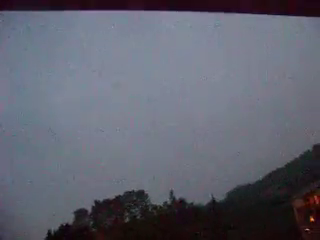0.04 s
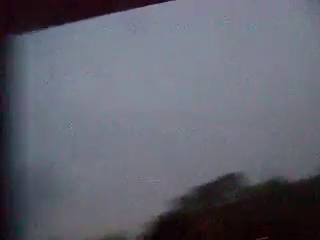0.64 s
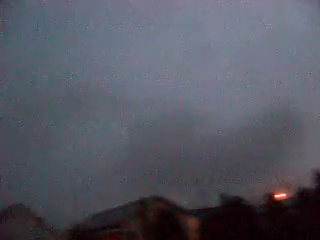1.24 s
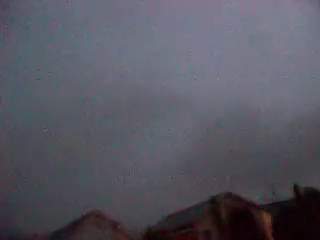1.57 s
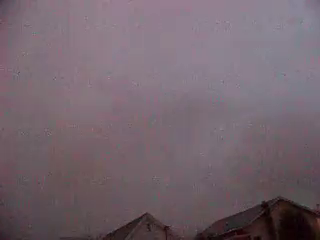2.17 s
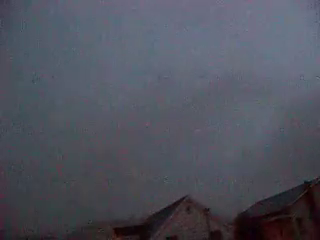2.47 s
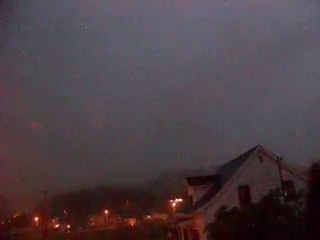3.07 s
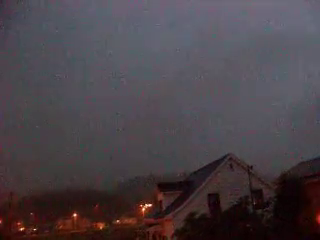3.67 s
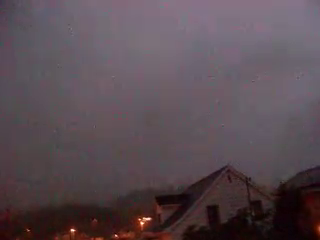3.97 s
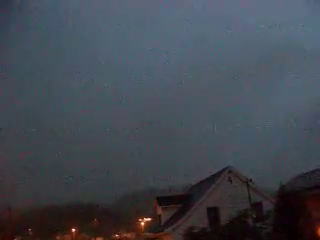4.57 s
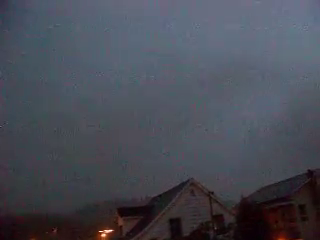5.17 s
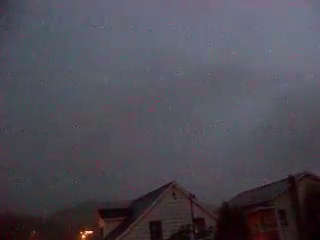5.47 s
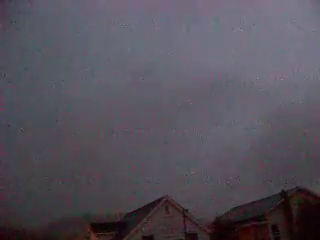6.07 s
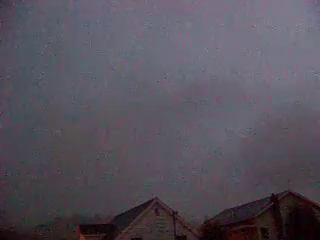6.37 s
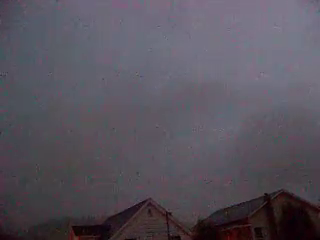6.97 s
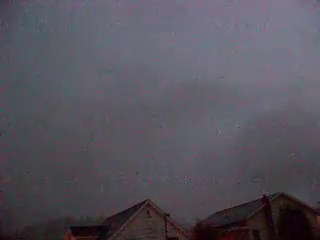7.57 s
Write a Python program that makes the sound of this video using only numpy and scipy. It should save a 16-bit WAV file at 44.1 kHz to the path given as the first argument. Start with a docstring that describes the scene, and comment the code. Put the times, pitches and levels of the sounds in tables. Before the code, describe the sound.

Thunder builds quickly from a few deep thuds to a booming clap, then rumbles on over a soft, even wash of rain. Occasional drips tap and ring on nearby metal. The rain swells, and a weaker, growling roll of thunder follows in several waves. The storm is picked up by a small camera microphone under a porch roof, which gives the rain a slightly hollow, muffled tone.

```python
"""Thunder over a hillside town in steady rain, heard from a porch through a small camera's microphone.
Shock waves from the lightning channel arrive as thuds, pile up into a clap and roll away; a second,
lighter peal follows while the rain swells. The porch roof rings hollow; a few drops ping on metal."""
import sys
import numpy as np
from scipy import signal
from scipy.fft import rfft, irfft
from scipy.io import wavfile
from scipy.ndimage import uniform_filter1d

SR = 44100
rng = np.random.default_rng(int(sys.argv[2]) if len(sys.argv) > 2 else 0)


def store_wav(level_fs):
    """Save 16-bit WAV to argv[1]."""
    pcm = np.round(np.clip(np.atleast_2d(level_fs), -1, 1) * 32767)
    wavfile.write(sys.argv[1], SR, pcm.T.astype(np.int16))


N = 345170
TIME = np.arange(N) / SR


def undb(db):
    """Decibels to gain."""
    return 10 ** (np.asarray(db) / 20)


def unit(x):
    """Scale to rms 1."""
    return x / np.sqrt(np.mean(x ** 2))


def add(out, start_s, sound):
    """Mix a sound in at start_s."""
    start = int(start_s * SR)
    out[start:start + len(sound)] += sound[:N - start]


def butter(x, hz, kind, order=2):
    """Butterworth low-, high- or band-pass."""
    return signal.sosfilt(signal.butter(order, hz, kind, fs=SR, output="sos"), x)


def colour(x, response):
    """Minimum-phase filter from (frequency [Hz], gain [dB]) rows; output rms 1."""
    hz, db = np.transpose(response)
    bins_hz = np.maximum(np.fft.rfftfreq(N, 1 / SR), 1)
    gain = undb(np.interp(np.log(bins_hz), np.log(hz), db))
    cepstrum = irfft(np.log(gain), N)
    cepstrum[1:N // 2] *= 2  # fold onto positive time: causal
    cepstrum[N // 2 + 1:] = 0
    return unit(irfft(rfft(x) * np.exp(rfft(cepstrum)), N))


def waver(per_s):
    """Random steps, smoothed twice; rms 1."""
    hold = int(SR / per_s)
    steps = np.repeat(rng.standard_normal(N // hold + 1), hold)
    return unit(uniform_filter1d(uniform_filter1d(steps, hold), hold)[:N])


def arrivals(per_s, spread_db):
    """Impulses of random time, size and sign."""
    hits = rng.random(N) < per_s / SR
    return hits * undb(spread_db * rng.standard_normal(N)) * rng.choice([-1, 1], N)


def envelope(bed_db, swells):
    """Gain of a steady bed plus swells that rise, hold and fall; powers add."""
    power = undb(bed_db) ** 2
    for crest_s, rise_db_per_s, hold_s, fall_db_per_s, db in swells:
        before_s = np.maximum(crest_s - TIME, 0)
        after_s = np.maximum(TIME - crest_s - hold_s, 0)
        power += undb(db - rise_db_per_s * before_s - fall_db_per_s * after_s) ** 2
    return np.sqrt(power)


def rain():
    """Far drops merge into a wash, nearer ones patter faintly; the porch roof adds a hollow band."""
    # rain spectrum: (frequency [Hz], gain [dB])
    spectrum = [(200, -12.5), (500, 0), (720, -8), (950, -0.5), (1200, 2), (1500, -3.5), (1850, -11),
                (2350, -9.5), (2750, -17.5), (3200, -19.5), (4000, -27.5), (5500, -32.5), (6800, -31),
                (8200, -45.5)]
    # roof ring, fading as the microphone turns to the open: (time [s], level re wash [dB])
    porch = [(0, -12), (1.25, -12), (1.7, -19.5), (2.1, -30), (3.6, -31), (4.2, -19), (7.8, -16)]
    # rain surges: (crest [s], rise [dB/s], hold [s], fall [dB/s], level [dB])
    surges = [(1.196, 31, 0.044, 12, -43.5), (4.103, 34, .08, 12.5, -41.5), (5.953, 18.5, 0.56, 6.5, -39)]
    wash = colour(rng.standard_normal(N), spectrum) * undb(0.26 * waver(per_s=9))
    patter = colour(arrivals(per_s=900, spread_db=2.5), spectrum)
    roof_db = np.interp(TIME, *np.transpose(porch))
    roof = unit(butter(rng.standard_normal(N), [700, 900], "band")) * undb(roof_db)
    return (wash + undb(-8.5) * patter + roof) * envelope(bed_db=-44.5, swells=surges)


def peal(spectrum, per_s, spread_db, even_s):
    """Shocks from countless kinks of the channel, dulled by the air; power levelled over even_s."""
    shocks = colour(arrivals(per_s, spread_db), spectrum)
    span = int(even_s * SR)
    power = uniform_filter1d(uniform_filter1d(shocks ** 2, span), span)
    return shocks / np.sqrt(power)


def thunder():
    """A deep, heaving roll and a lighter growl swell over the steady bed of the distant storm."""
    # roll and growl spectra: (frequency [Hz], gain [dB])
    roll_spectrum = [(20, -43), (35, -22.5), (50, -8.5), (70, -2), (95, 1), (125, -0.5), (170, -6),
                     (230, -14), (350, -21), (500, -40.5), (800, -54), (2000, -69)]
    growl_spectrum = [(40, -18.5), (90, -16.5), (150, -1.5), (215, 2.5), (290, -4), (370, -2.5),
                      (500, -6.5), (620, -17), (800, -27), (1500, -59.5)]
    # one swell per channel branch or hill echo:
    # (crest [s], rise [dB/s], hold [s], fall [dB/s], roll level [dB], growl level [dB])
    swells = [(0.388, 18, .04, 21.5, -47, -40), (1.127, 49, .12, 32, -35.5, -41),
              (1.32, 200, 0.33, 28, -28.5, -43), (1.669, 153, 0.23, 120, -23, -37.5),
              (1.979, 170, 0.036, 34, -25.5, -38), (2.417, 120, 0.12, 6, -34, -53.5),
              (3.763, 49, 0.1, 21.5, -36.5, -47.5), (4.2, 24, 0.087, 20.5, -47.5, -41),
              (4.47, 79, 0.023, 35, -40.5, -47), (5.359, 67, 0.058, 62, -45, -32),
              (5.61, 163, 0.12, 25, -40.5, -31.5), (6.06, 35, 0.046, 27, -38, -28),
              (6.297, 58, 0.12, 26, -37, -32), (6.847, 50, 0.2, 20, -41, -39),
              (7.26, 88, 0.02, 26.5, -42, -33.3)]
    roll_gain = envelope(bed_db=-46.5, swells=[(*shape, db) for *shape, db, _ in swells])
    growl_gain = envelope(bed_db=-45.5, swells=[(*shape, db) for *shape, _, db in swells])
    roll = peal(roll_spectrum, per_s=1500, spread_db=2, even_s=0.032) * roll_gain
    growl = peal(growl_spectrum, per_s=2000, spread_db=2, even_s=0.052) * growl_gain
    heave_db = 0.8 * waver(per_s=22)
    return roll * undb(heave_db) + growl


def drips():
    """Heavy drops: a short dull splash and a faint ring of the metal they strike."""
    # drops on a rail or gutter: (time [s], ring level [dB], splash level [dB])
    drops = [(.325, -46, -53), (1.96, -51, -47), (2.043, -58, -46), (2.245, -48, -45), (2.971, -45.5, -56),
             (4.015, -46, -46), (4.032, -63, -29.5), (4.135, -43.5, -45), (4.152, -54, -36),
             (4.23, -56, -36)]
    # metal modes: (frequency [Hz], level [dB], t60 [s])
    modes = [(1919, -1, 0.24), (2870, -15, .14), (3830, -17, .21)]
    out, t = np.zeros(N), TIME[:SR // 3]
    ring = sum(undb(db - 60 * t / t60_s) * np.sin(2 * np.pi * hz * t) for hz, db, t60_s in modes)
    splash_decay = np.exp(-t / 0.0057)
    for start_s, ring_db, splash_db in drops:
        splash = unit(butter(rng.standard_normal(len(t)), [350, 1500], "band", order=3)) * splash_decay
        add(out, start_s, undb(ring_db) * ring + undb(splash_db) * splash)
    return out


def thuds():
    """Broadside stretches of channel arrive all at once; distance rounds each to a few deep swings."""
    # strong shock fronts: (time [s], peak level [dB], pitch [Hz])
    fronts = [(.91, -29, 99), (0.923, -27, 141), (1.199, -14, 90), (1.334, -30, 85), (1.66, -24, 78),
              (1.682, -21, 195), (1.697, -21, 80), (1.726, -11, 125), (1.763, -12, 118), (1.80, -18.5, 100),
              (1.827, -16, 139), (1.861, -10, 94), (1.883, -20.5, 175), (2.113, -25, 100),
              (2.214, -30.5, 136), (2.506, -24.5, 114), (2.79, -24.5, 119), (3.089, -28.5, 112),
              (5.372, -25, 180), (5.6, -23, 227), (6.235, -32, 72)]
    out, t = np.zeros(N), TIME[:SR // 10] - 0.05  # centred on the peak
    width_cycles = 1.07
    for peak_s, db, hz in fronts:
        cycles = hz * t
        pulse = -np.cos(2 * np.pi * cycles) * np.exp(-(cycles / width_cycles) ** 2)
        add(out, peak_s + t[0], undb(db) * pulse)
    return out


def scene():
    """Rain, thunder, drips and thuds; mono."""
    return (rain() + thunder() + drips() + thuds())[None]


def record(dry):
    """Deep bass cut, two narrow dips, top cut. A faint fizz rides on the loud swings."""
    # microphone response dips: (frequency [Hz], width [Hz])
    notches = [(298, 55), (965, 57)]
    fizz_db, rolloff_hz, top_hz = -32.5, 7380, 8200
    sound = butter(dry, 27, "high", order=3)
    for hz, width_hz in notches:
        sound = signal.lfilter(*signal.iirnotch(hz, hz / width_hz, fs=SR), sound)
    sound = sound * (1 + undb(fizz_db) * rng.standard_normal(N))
    sound = butter(sound, rolloff_hz, "low", order=6)
    return signal.sosfilt(signal.ellip(8, .2, 70, top_hz, fs=SR, output="sos"), sound)


dry = scene()
out = record(dry)
store_wav(out)
```